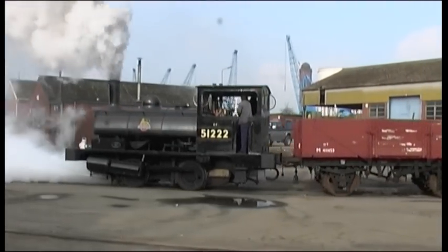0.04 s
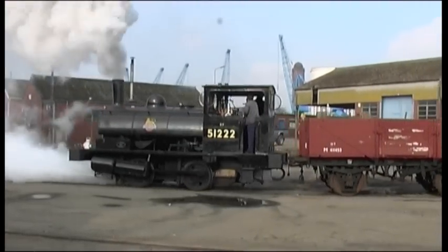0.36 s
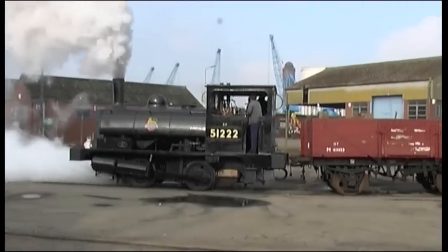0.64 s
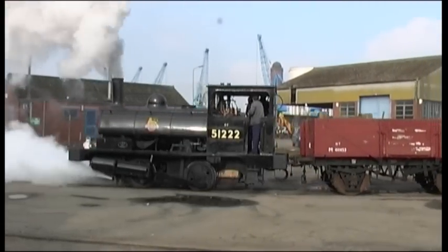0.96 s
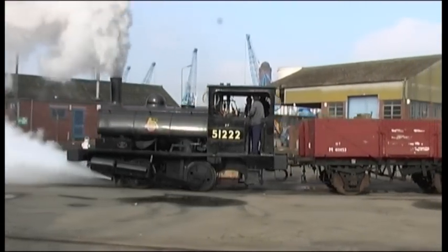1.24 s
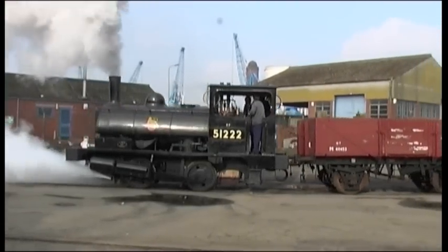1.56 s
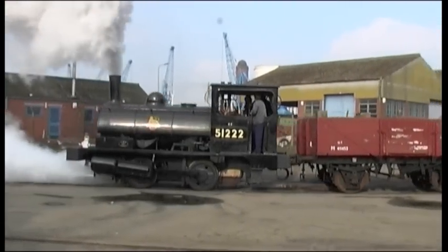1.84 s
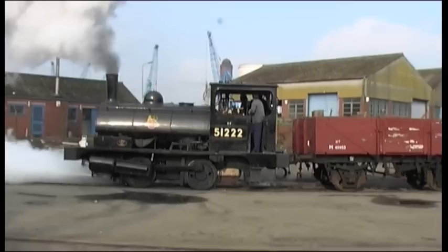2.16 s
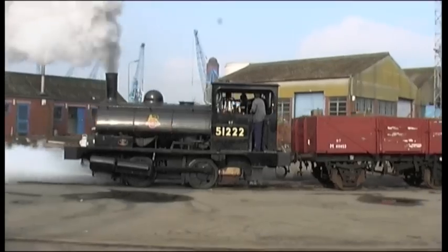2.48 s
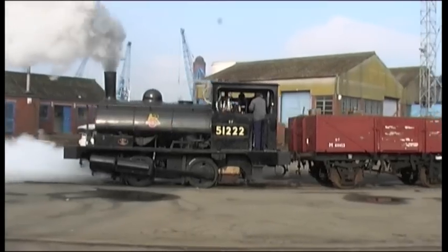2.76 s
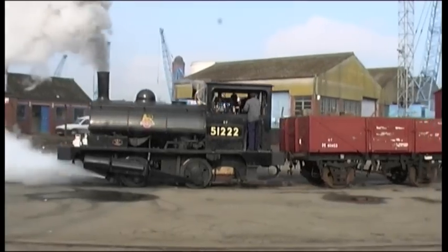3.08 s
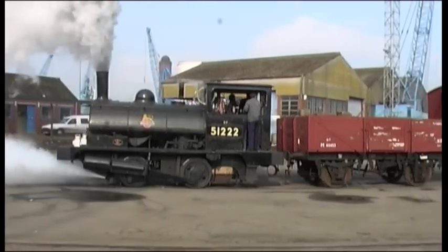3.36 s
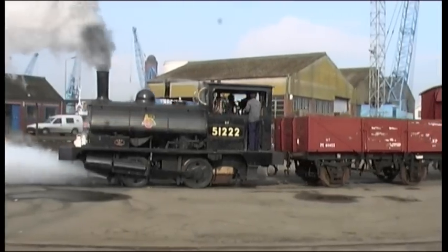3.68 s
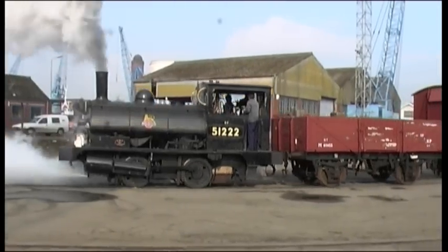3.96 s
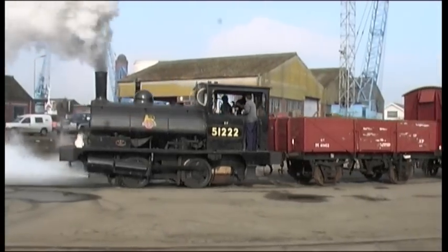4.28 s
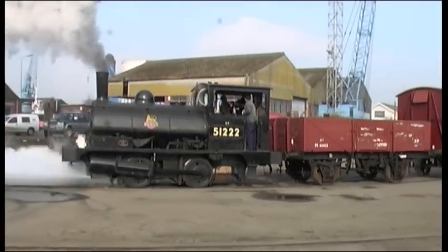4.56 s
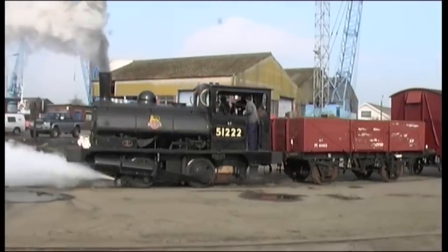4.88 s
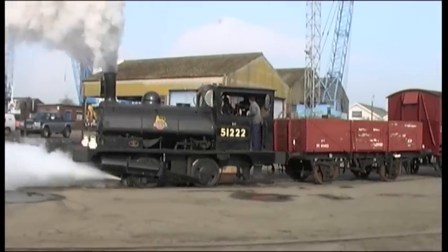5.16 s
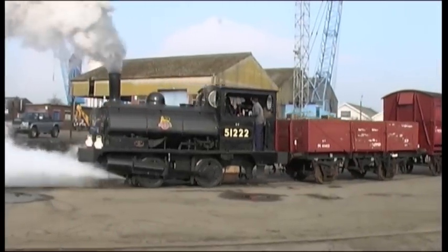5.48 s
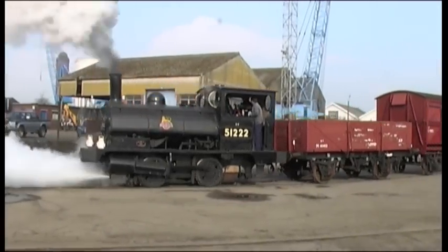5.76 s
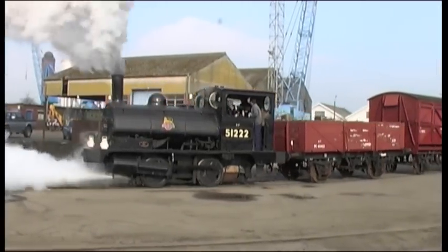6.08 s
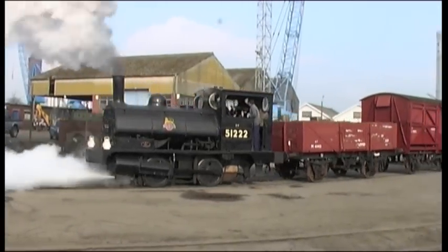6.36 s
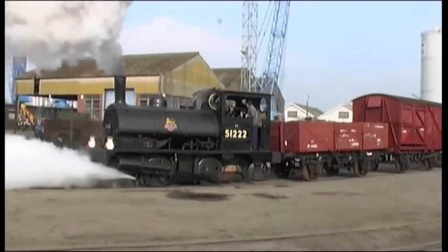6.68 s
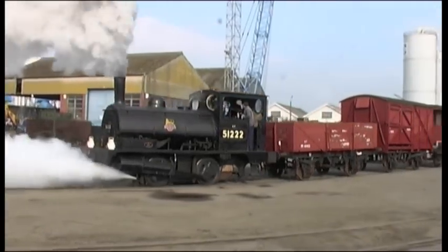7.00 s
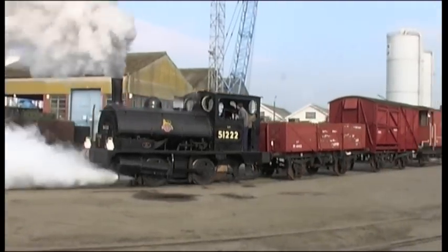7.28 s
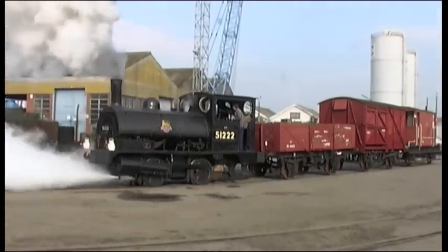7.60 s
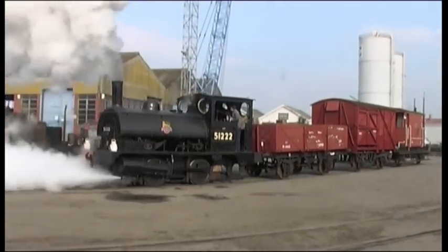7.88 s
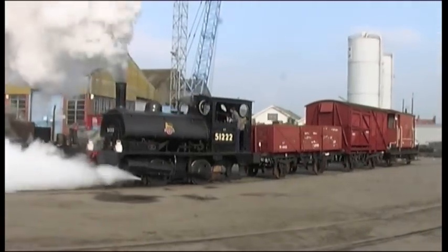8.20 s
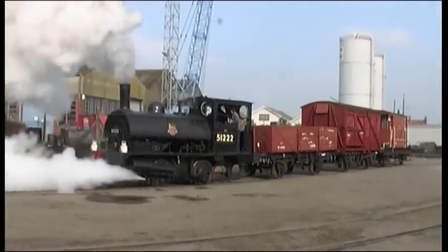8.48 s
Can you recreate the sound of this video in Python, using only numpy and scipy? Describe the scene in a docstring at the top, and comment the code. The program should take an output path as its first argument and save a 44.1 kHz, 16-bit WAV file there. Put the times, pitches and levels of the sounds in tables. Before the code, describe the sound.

Sharp, rhythmic hissing from a passing steam engine dominates, heard from nearby outdoors in very light wind. Each blast runs into the next, some opening hoarsely with a spit of water, while the chimney chuffs quietly below. A faint low groan swells early on. The rhythm then picks up a little and the boiler's rush recedes, before the strongest blasts of steam come with a slight low roar.

```python
"""A small steam locomotive draws wagons slowly past across an open yard, in a little wind.
From the start its open drain cocks hiss in turn with the piston strokes, now and then spitting water,
while the chimney chuffs four times a wheel turn and booms at its pipe resonance. Near 1.7 s a low groan
swells in the running gear. Then the beats quicken and weaken, and the boiler's rush fades as the engine
draws away. Near the end come the loudest blasts of steam, with brief low rumbles under them."""
import sys
import numpy as np
from scipy import signal
from scipy.fft import rfft, irfft, next_fast_len
from scipy.io import wavfile
from scipy.ndimage import uniform_filter1d, map_coordinates

SR = 44100
rng = np.random.default_rng(int(sys.argv[2]) if len(sys.argv) > 2 else 0)


def unload_audio(sound):
    """Save the sound as a 16-bit wav file, at the path given as the first command line argument."""
    columns = np.transpose(np.atleast_2d(sound))
    # keep every value between -1 and 1, then stretch to whole-number steps
    steps = np.round(np.clip(columns, -1, 1) * 32767)
    wavfile.write(sys.argv[1], SR, steps.astype(np.int16))


N = 376613
TIME = np.arange(N) / SR

# Spectrum of the breeze and the rumbles. Each row: frequency in Hz, relative level in dB.
RUMBLE_SPECTRUM = [(15, -8), (30, -4), (55, 3), (90, 2), (160, -3), (400, -23)]
# Brief low rumbles under blasts of steam. Each row: start in seconds, length in seconds, level in dB.
RUMBLES = [(.9, .45, -52), (6.76, .16, -43), (8.2, .08, -47), (8.42, .12, -37)]
# Steady rush of the boiler and leaking glands. Each row: frequency in Hz, relative level in dB.
BOILER_SPECTRUM = [(53, -54), (90, -25.5), (152, -15), (268, -17), (345, -16), (466, -16), (533, -14.5),
                   (619, -17), (822, -12.5), (1180, -8), (1490, -4), (1870, -9), (3200, -1), (4160, -12.5),
                   (7040, -120)]
# Resonances of that rush. Each row: frequency in Hz, half-width in Hz, strength in dB.
BOILER_MODES = [(348, 14, -2.5), (1050, 22, -11), (1166, 37, -8.5), (1540, 17, -18), (1690, 38, -6.5),
                (2215, 33, -10)]
# Exhaust beats. Each row: start in seconds, nominal length in seconds, relative levels of rush and
# boom in dB.
CHUFFS = [(-.04, 0.15, -28.5, -32), (0.546, .15, -29, -41.5), (1.124, 0.28, -32, -44.5),
          (1.667, .18, -32.5, -34), (2.201, 0.15, -31.5, -34.5), (2.733, 0.17, -31.5, -33.5),
          (3.226, 0.27, -33.5, -35), (3.686, 0.14, -32, -44), (4.122, 0.22, -34, -43),
          (4.62, .17, -32, -41), (5.085, 0.19, -34, -34), (5.483, 0.17, -38, -40.5), (5.95, 0.16, -36, -35),
          (6.418, 0.11, -30.5, -32), (6.83, 0.2, -36.5, -43), (7.20, 0.12, -36, -40),
          (7.626, 0.11, -39, -44), (8.062, 0.15, -36.5, -44)]
# Spectrum of an exhaust beat. Each row: frequency in Hz, relative level in dB.
CHUFF_SPECTRUM = [(50, -28), (100, -12), (170, -4.5), (260, -9), (340, -7.5), (450, -2), (620, -3),
                  (850, -8), (1400, -3.5), (2500, -20), (6000, -35)]
# Higher resonances of chimney and smokebox. Each row: frequency in Hz, half-width in Hz, strength in dB.
CHIMNEY_MODES = [(305, 9.2, -4), (419, 16, -7), (528, 16, -9), (670, 26, -4.5)]
# Slugs of water. Each row: start in seconds, length in seconds, spray level in dB, gurgle level in dB.
SPITS = [(0.74, 0.062, -23, -37), (0.806, 0.1, -24, -36), (0.93, 0.11, -28, -41), (1.677, .06, -25, -45),
         (2.913, 0.04, -20.5, -48), (3.859, 0.035, -23.5, -48), (4.771, .03, -18.5, -38),
         (5.66, .05, -30.5, -52), (6.5, .05, -26.5, -50)]
# Resonances of a spit. Each row: frequency in Hz, half-width in Hz, strength in dB.
SPIT_MODES = [(225, 26, -13), (343, 39, -9.5), (756, 76, -5.5), (1030, 82, -4), (1170, 37, -2),
              (1443, 56, 2.5), (1720, 67, -2)]
# Piston strokes, rear and front cock in turn. Each row: start, rise, length and decay time in seconds,
# level in dB, top treble relative to that level in dB, its mid-stroke swell in dB, singing pitch in Hz,
# its strength in dB, centre of a spectral hollow in Hz, its gain in dB, hoarseness on opening in dB.
STROKES = [(-.1, .05, 0.68, 0.4, -10, -20, 3, 6500, 1, 4620, -2.5, -7),
           (.775, 0.11, 0.67, 0.61, -9, -21.5, 2.5, 4900, 3.5, 11500, -8, 12),
           (1.793, 0.094, 0.91, 0.55, -9.5, -18.5, 4.5, 7680, 2, 10000, -3.5, 8),
           (2.884, 0.066, 0.54, 0.39, -9, -19.5, 1.5, 3580, 1, 6200, -1, 3),
           (3.852, 0.044, 0.72, 0.31, -9.4, -19, 6.5, 4500, 0.5, 5640, 0, 8),
           (4.78, .024, 0.55, 0.19, -8.5, -16.5, -0.7, 5500, 1, 8700, -5, -3),
           (5.628, .058, 0.67, 0.29, -9.5, -18.5, 3.8, 8900, 2, 6660, -2, 2),
           (6.484, 0.089, 0.62, 0.14, -7.5, -19.5, 5, 7800, 1, 6760, -.5, 13),
           (7.302, 0.17, 0.56, 0.29, -9, -23.5, 12, 6050, 1, 7960, -2, 5),
           (8.168, 0.051, 0.57, .25, -6, -13.5, 0.5, 5700, 2.5, 8400, -4, 13)]
# Brief falters of the jet. Each row: start, onset time and length in seconds, change of level in dB.
FALTERS = [(4.27, .07, 0.14, -1.2), (5.793, 0.055, .08, -.9), (6.164, 0.12, 0.16, -2.2),
           (7.842, .015, 0.052, -2)]
# Spectra of the two cocks. Each row: frequency in Hz, relative level in dB.
REAR_COCK_SPECTRUM = [(1180, -17), (2000, -18), (2350, -15.5), (2960, -9.5), (3860, -1), (4510, 1.5),
                      (5170, -2), (6180, -4), (7590, -1.5), (8550, -2), (9810, -2), (11000, -13),
                      (12600, -9), (13900, -17), (15400, -47)]
FRONT_COCK_SPECTRUM = [(1180, -47), (2000, -17.5), (2700, -12), (3460, -4.5), (4580, -0.5), (5770, -3.5),
                       (6680, -4.5), (7990, -3), (9640, -3), (11000, -14), (12000, -11.5), (12900, -14),
                       (13900, -19.5), (15400, -69)]
# Resonances of the drain pipes. Each row: frequency in Hz, half-width in Hz, strength in dB.
PIPE_MODES = [(3880, 260, -12), (4520, 170, -17), (5770, 150, -15.5), (11860, 250, -10.5)]
# Balance of the two microphone ports. Each row: frequency in Hz, left minus right in dB.
PORT_BALANCE = [(60, 1.5), (110, 1), (200, -1), (380, 0.5), (700, 5), (1290, 2), (2380, 3.5), (4390, 1.5),
                (8110, 2.5), (15000, -9)]
# Likeness of the sound at the two ports. Each row: frequency in Hz, coherence from 0 to 1.
PORT_COHERENCE = [(60, 1), (130, 1), (290, 0.95), (640, 0.74), (1410, 0.88), (3090, 0.93), (6810, 0.93),
                  (15000, 0.69)]

JET_BAND_HZ, TOP_BAND_HZ = (3000, 10000), (10500, 14000)


def undb(db):
    """Amplitude grows tenfold with every 20 dB."""
    return 10 ** (np.asarray(db) / 20)


def over_hz(points, hz):
    """Interpolation between points on a logarithmic frequency axis."""
    f, value = np.transpose(points)
    return np.interp(np.log(hz + 1), np.log(f), value)


def resonances(modes, hz):
    """Each mode responds in a bell-shaped peak about its natural frequency, and the responses add."""
    return sum(undb(db) / (1 + ((hz - f) / width) ** 2) for f, width, db in modes)


def band_db(gain, hz, band):
    """Powers add across frequency: the level within a band for each column of gains."""
    inside = (hz > band[0]) & (hz < band[1])
    return 10 * np.log10(np.sum(gain[inside] ** 2, axis=0) / len(hz))


def turbulence(gain):
    """Partly coherent noise of rms 1: the two ports share one part, and each has a part of its own."""
    size = next_fast_len(N)
    hz = np.arange(size // 2 + 1) * SR / size
    draws = rng.standard_normal((3, len(hz))) + 1j * rng.standard_normal((3, len(hz)))
    shared = np.clip(over_hz(PORT_COHERENCE, hz), 0, 1)
    spectrum = np.sqrt(shared) * draws[0] + np.sqrt(1 - shared) * draws[1:]
    x = irfft(gain(hz) * spectrum, size)[:, :N]
    return x / np.std(x)


def wander(rate_hz):
    """A continuous random fluctuation with a spread near 1."""
    steps = rng.standard_normal(int(N / SR * rate_hz) + 2)
    return 1.42 * np.interp(TIME * rate_hz, np.arange(len(steps)), steps)


def puff(start, length, rise, fall, t=TIME):
    """An envelope rises linearly, holds and decays exponentially; times are in seconds."""
    age = t - start
    return np.clip(age / rise, 0, 1) * np.exp(-np.maximum(age - length, 0) / fall)


def breeze_and_rumbles(breeze_db=-58, waver_db=2.0):
    """Low-frequency noise: a faint breeze, and brief rumbles under the loudest blasts of steam."""
    rumbles = sum(undb(db) * puff(s, length, rise=.07, fall=.06) for s, length, db in RUMBLES)
    strength = (undb(breeze_db) + rumbles) * undb(waver_db * wander(9))
    return strength * turbulence(lambda hz: undb(over_hz(RUMBLE_SPECTRUM, hz)))


def boiler(level_db=-21.5, waver_db=0.76, speed_m_s=2.05, closest_s=0.89, distance_m=13.3):
    """Spherical spreading: the boiler's steady rush falls in amplitude inversely with distance."""
    nearness = distance_m / np.hypot(distance_m, speed_m_s * (TIME - closest_s))
    rush = turbulence(lambda hz: undb(over_hz(BOILER_SPECTRUM, hz)) * (1 + resonances(BOILER_MODES, hz)))
    return nearness * undb(level_db + waver_db * wander(14)) * rush


def groan(level_db=-44, swell_db=10.5, peak_s=1.69, swell_s=0.16, pitch_hz=181, sag_hz_per_s=7):
    """Friction makes a part of the running gear hum; the tone swells once and sinks slowly in pitch."""
    from_peak = TIME - peak_s
    contact = puff(start=0.56, length=1.48, rise=.06, fall=0.13)
    db = level_db + swell_db * np.exp(-(from_peak / swell_s) ** 2) + 3 * wander(9.5)
    hz = (pitch_hz - sag_hz_per_s * from_peak) * (1 + 0.012 * wander(30))
    return np.sqrt(2) * contact * undb(db) * np.sin(2 * np.pi * np.cumsum(hz) / SR)


def chimney(rush_gain_db=4.0, boom_hz=147, throb_db=2, ragged_db=1.1):
    """Pipe resonance: each exhaust beat rushes up the chimney and sets its air column booming."""
    rush = sum(undb(db) * puff(s, length * 0.65, rise=0.019, fall=0.066) for s, length, db, _ in CHUFFS)
    boom = sum(undb(db) * puff(s, length * 0.92, rise=0.017, fall=0.062) for s, length, _, db in CHUFFS)
    # the column swings at nearly one pitch, shaken by the turbulent blast
    pitch_hz = boom_hz * (1 + 0.0143 * wander(25))
    swing = np.sqrt(2) * np.sin(2 * np.pi * np.cumsum(pitch_hz) / SR) * undb(throb_db * wander(28))
    column = swing + 0.59 * turbulence(lambda hz: resonances([(boom_hz, 22, 0)], hz))
    blast = turbulence(
        lambda hz: undb(over_hz(CHUFF_SPECTRUM, hz)) * (1 + resonances(CHIMNEY_MODES, hz)))
    return undb(rush_gain_db + ragged_db * wander(60)) * rush * blast + boom * column / np.std(column)


def spits(splutter_db=1.5, gurgle_hz=215, gurgle_width_hz=40):
    """Slugs of condensed water excite resonances as they gurgle in the drain pipes and splutter out."""
    slugs = np.array([puff(s, length, rise=0.0082, fall=0.035) for s, length, _, _ in SPITS])
    spray_gain, gurgle_gain = undb(np.array(SPITS)[:, 2:].T) @ slugs
    splutter = undb(splutter_db * wander(110))
    spray = turbulence(lambda hz: resonances(SPIT_MODES, hz))
    gurgle = turbulence(lambda hz: resonances([(gurgle_hz, gurgle_width_hz, 0)], hz))
    return splutter * (spray_gain * spray + gurgle_gain * gurgle)


def piston_strokes(t, leak_db=-18.5, wet_s=0.05, mid_stroke_s=0.42, pressure_width_s=0.37):
    """Cylinder pressure drives the jets: the leading stroke, its wetness, level and top treble."""
    start, rise, length, fall, peak_db, treble_db, swell_db = np.array(STROKES)[:, :7].T
    flows = np.array([undb(db) * puff(*timing, t)
                      for db, *timing in zip(peak_db, start, length, rise, fall)])
    stroke = np.argmax(flows, axis=0)
    age = t - start[stroke]
    wet = np.exp(-np.abs(age - 0.54 * rise[stroke]) / wet_s)
    pressure = np.exp(-((age - mid_stroke_s) / pressure_width_s) ** 2)
    level_db = 20 * np.log10(np.maximum(flows.max(axis=0), undb(leak_db)))  # never quite silent
    falter_db = sum(db * puff(s, hold, onset, fall=0.034, t=t) for s, onset, hold, db in FALTERS)
    # pressure brightens the jet; a weak, wet or faltering jet is duller
    bright_db = treble_db[stroke] + swell_db[stroke] * pressure
    dull_db = 0.05 * (level_db - peak_db[stroke]) - 4.5 * wet + 3.3 * falter_db
    return stroke, wet, level_db + falter_db, bright_db + dull_db


def overload_roar(roar_db=-27, loudest_db=-6, db_per_db=4.0, low_hz=330, high_hz=2100):
    """Intermodulation: a noise band stands for the low roar of recorder overload under the loudest hiss."""
    level_db = piston_strokes(TIME)[2]
    band = turbulence(lambda hz: 1 / np.sqrt((1 + (low_hz / (hz + 1)) ** 4) * (1 + (hz / high_hz) ** 8)))
    return undb(roar_db + db_per_db * (level_db - loudest_db)) * band


def drain_cocks(hoarse_hz=3100, pivot_hz=5500, eddy_db=1.66, skirt_hz=1900, thinning_hz_per_s=75):
    """Turbulent jets hiss from the two cocks in turn, most starting hoarse, brightening with pressure."""
    pipe_noise = turbulence(lambda hz: 1 + resonances(PIPE_MODES, hz))
    hz, t, steam = signal.stft(pipe_noise, SR, nperseg=512)
    f = hz[:, None]
    stroke, wet, level_db, top_db = piston_strokes(t)
    sing_hz, sing_db, hollow_hz, hollow_db, hoarse_db = np.array(STROKES)[stroke, 7:].T
    db = np.where(stroke % 2, over_hz(FRONT_COCK_SPECTRUM, f), over_hz(REAR_COCK_SPECTRUM, f))
    db += sing_db * np.exp(-((f - sing_hz) / (.155 * sing_hz)) ** 2)
    db += hollow_db * np.exp(-((f - hollow_hz) / 550) ** 2)
    db += hoarse_db * wet * np.exp(-((f - hoarse_hz) / 800) ** 2)  # wet steam comes first, sounds lower
    # a faster jet lifts the treble above the pivot
    lift_db = top_db - band_db(undb(db), hz, TOP_BAND_HZ) + band_db(undb(db), hz, JET_BAND_HZ)
    db += lift_db * np.clip((f - pivot_hz) / 6000, 0, 1.4)
    # eddies make neighbouring pitches swell and fade together
    eddies = uniform_filter1d(rng.standard_normal(db.shape), size=2, axis=0)
    eddies = uniform_filter1d(eddies, size=40, axis=1)
    gain = undb(db + eddy_db * eddies / np.std(eddies))
    # so narrow a nozzle gives almost nothing below its skirt; the low edge of the hiss slowly thins
    gain /= np.sqrt(1 + ((skirt_hz + thinning_hz_per_s * t) / (f + 1)) ** 10)
    gain *= undb(level_db - 0.08 - band_db(gain, hz, JET_BAND_HZ))
    hiss = signal.istft(steam * gain, SR, nperseg=512)[1][:, :N]
    flutter_db = 0.52 * wander(45) + 0.28 * wander(12)
    return hiss * undb(flutter_db)


def ground_reflection(direct, lag_ms=2.2, wander_ms=0.27, echo_db=-21):
    """Interference with a ground echo, whose path wanders as the engine rolls, phases the hiss faintly."""
    lag_s = (lag_ms + wander_ms * wander(2)) / 1000
    echo = np.array([map_coordinates(port, [(TIME - lag_s) * SR], order=3) for port in direct])
    return direct + undb(echo_db) * echo


def scene():
    """The sources superpose; a level difference moves the engine from a little left to about centre."""
    steam = ground_reflection(drain_cocks() + spits() + boiler())
    engine = steam + chimney() + groan() + overload_roar()
    pan_db = np.interp(TIME, [0, N / SR], [.5, -.4])
    return engine * undb(np.array([pan_db, -pan_db]) / 2) + breeze_and_rumbles()


def record(dry, ceiling=0.93, asymmetry=.05, cutoff_hz=15400):
    """Each port colours the sound; asymmetric clipping adds a low roar to peaks, and the top is cut."""
    size = next_fast_len(N)
    balance_db = over_hz(PORT_BALANCE, np.arange(size // 2 + 1) * SR / size)
    port_gain = undb(np.array([balance_db, -balance_db]) / 2)
    heard = irfft(rfft(dry, size) * port_gain, size)[:, :N]
    lopsided = heard + asymmetry * np.minimum(np.abs(heard), ceiling) ** 4
    clipped = np.clip(lopsided, -ceiling, ceiling)
    offset_block = signal.butter(1, 15, "high", fs=SR, output="sos")
    low_pass = signal.ellip(8, .2, 70, cutoff_hz, fs=SR, output="sos")
    return signal.sosfilt(low_pass, signal.sosfilt(offset_block, clipped))


dry = scene()
out = record(dry)
unload_audio(out)
```